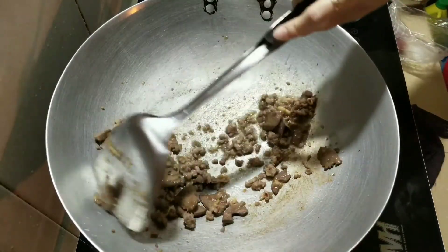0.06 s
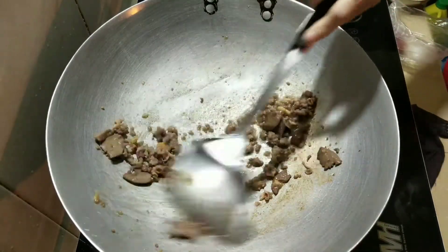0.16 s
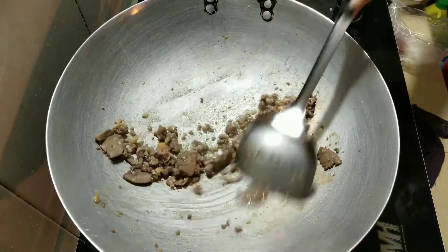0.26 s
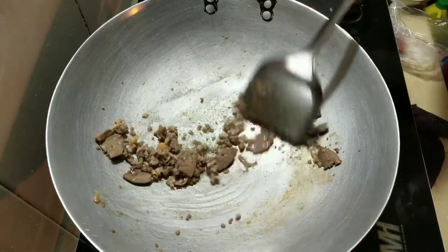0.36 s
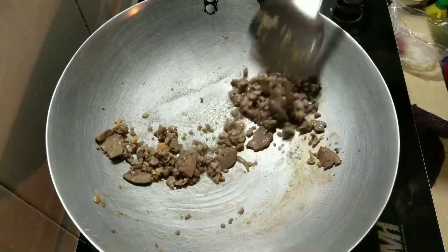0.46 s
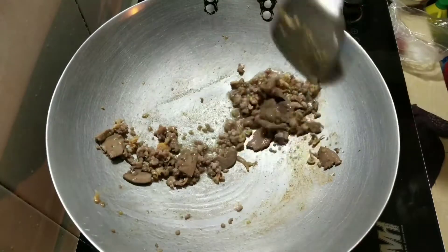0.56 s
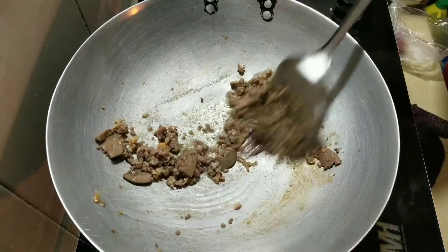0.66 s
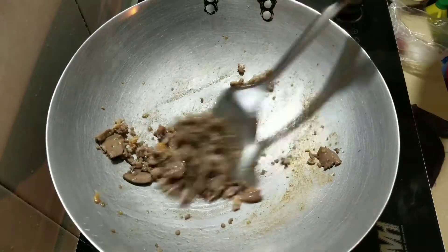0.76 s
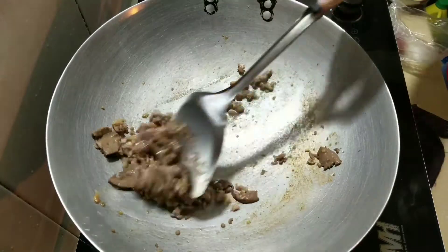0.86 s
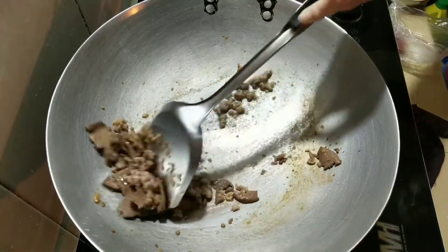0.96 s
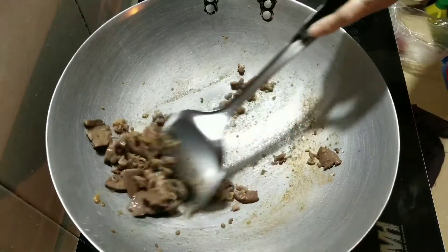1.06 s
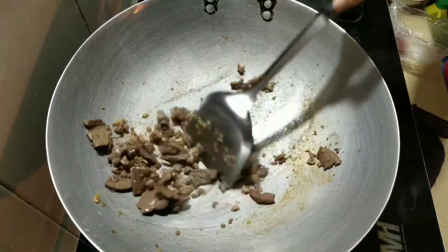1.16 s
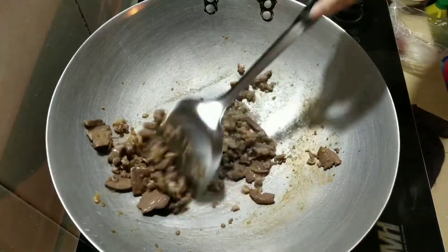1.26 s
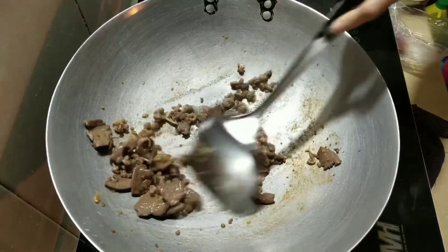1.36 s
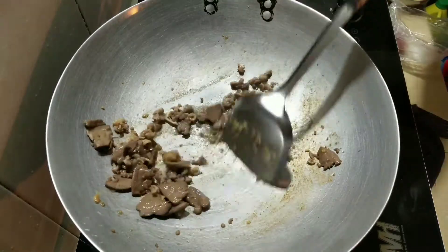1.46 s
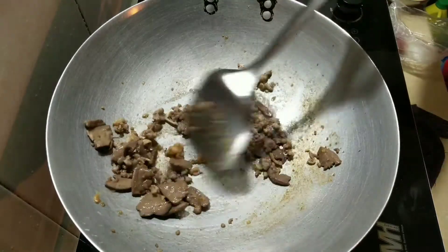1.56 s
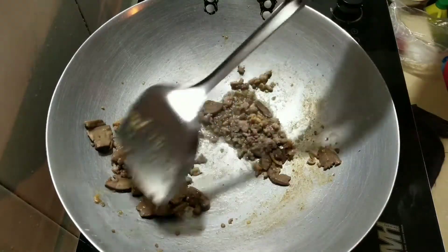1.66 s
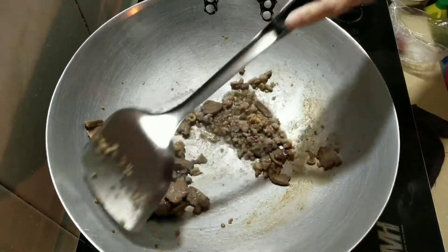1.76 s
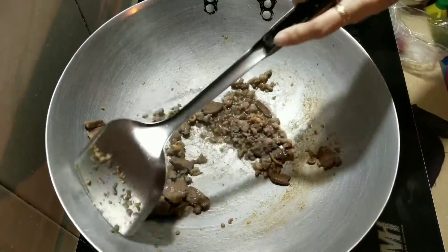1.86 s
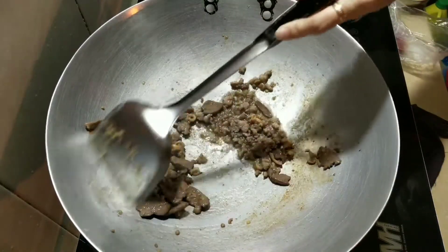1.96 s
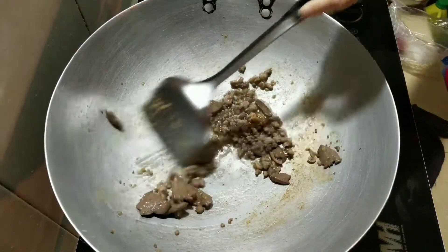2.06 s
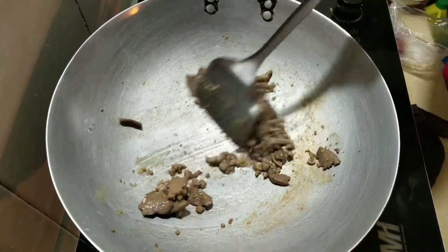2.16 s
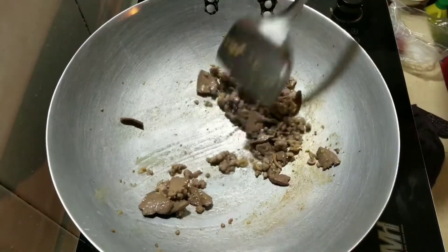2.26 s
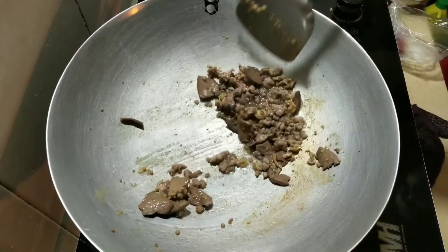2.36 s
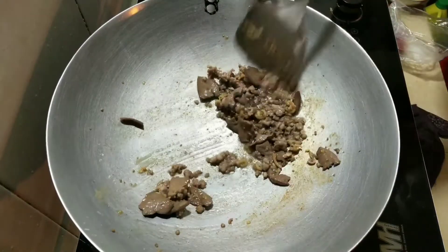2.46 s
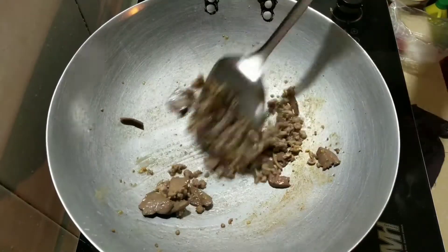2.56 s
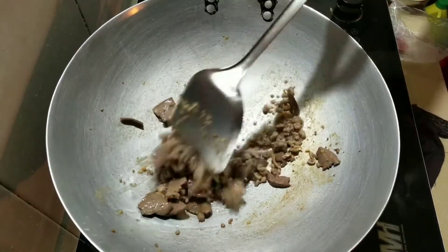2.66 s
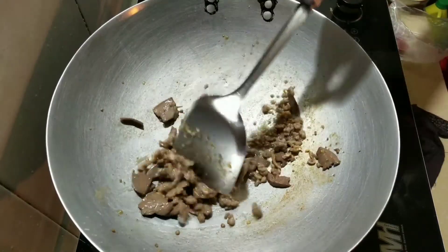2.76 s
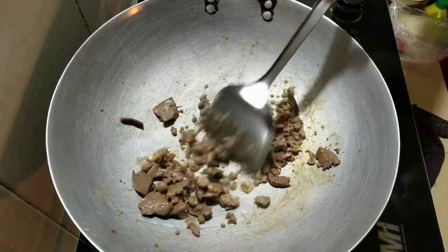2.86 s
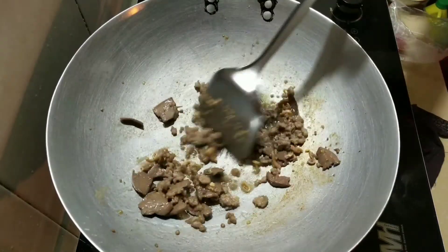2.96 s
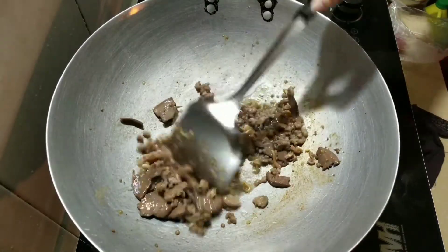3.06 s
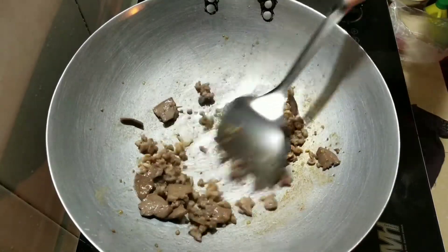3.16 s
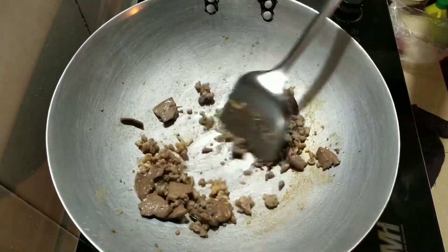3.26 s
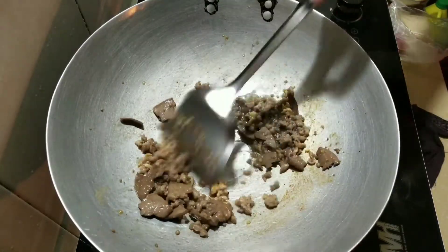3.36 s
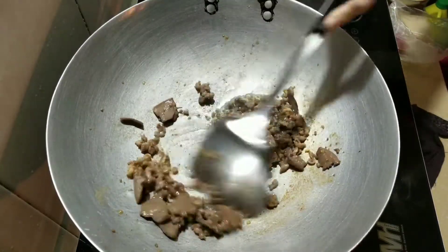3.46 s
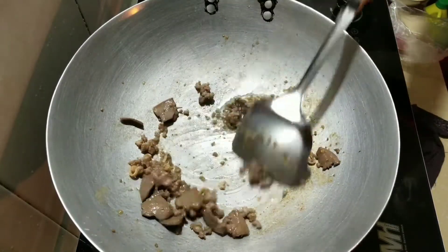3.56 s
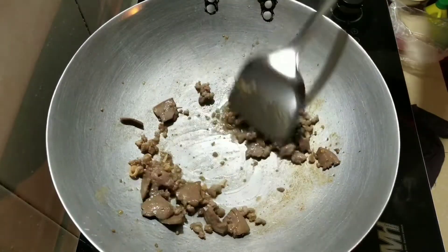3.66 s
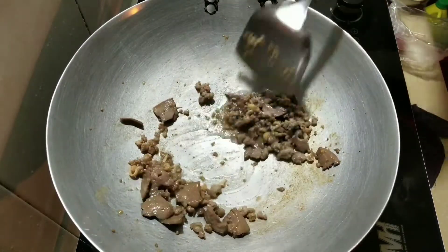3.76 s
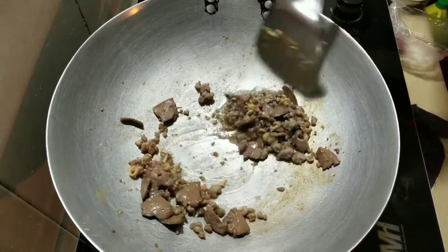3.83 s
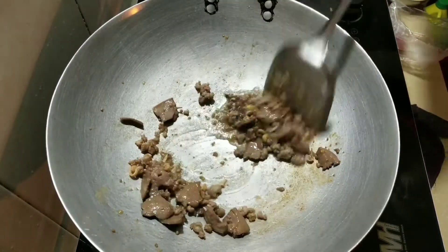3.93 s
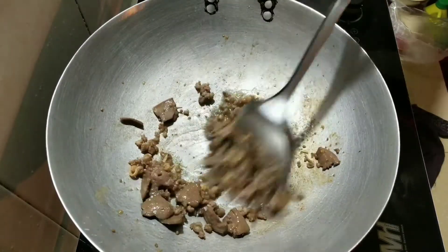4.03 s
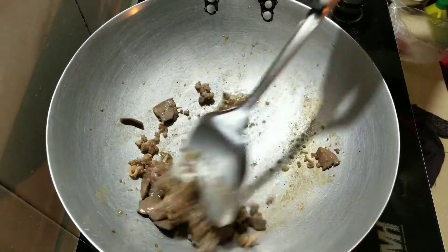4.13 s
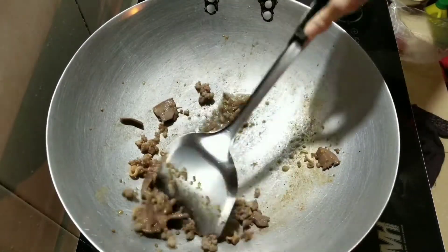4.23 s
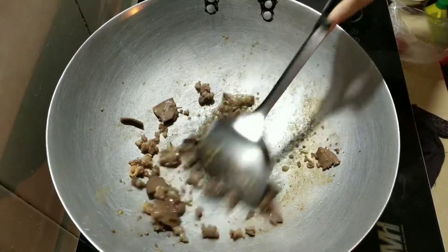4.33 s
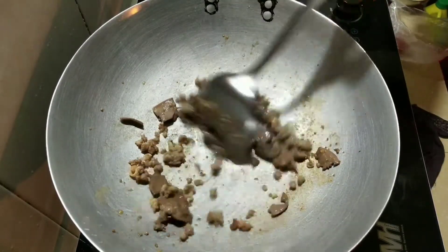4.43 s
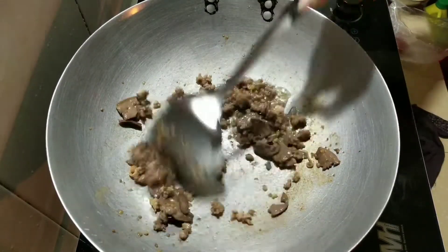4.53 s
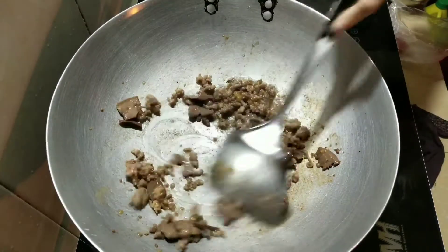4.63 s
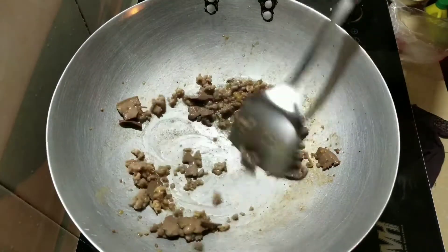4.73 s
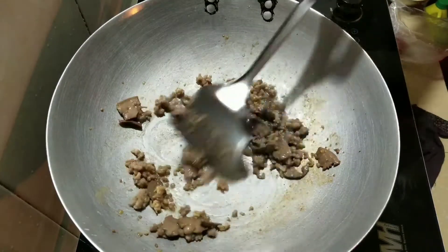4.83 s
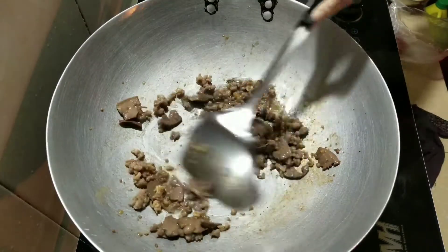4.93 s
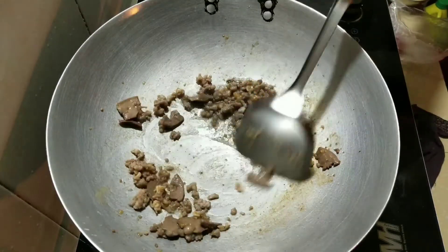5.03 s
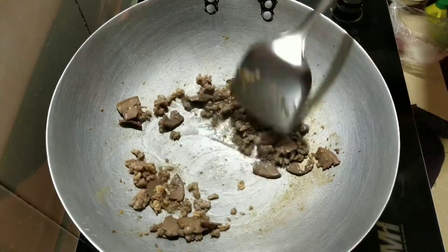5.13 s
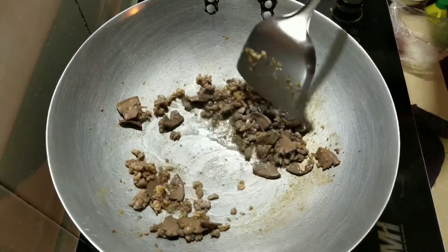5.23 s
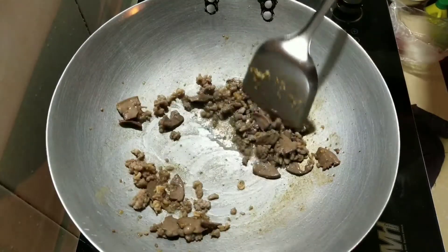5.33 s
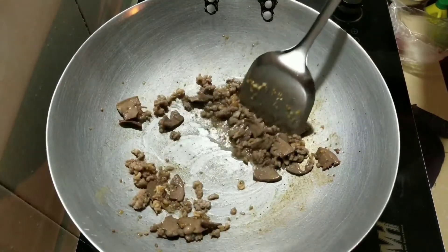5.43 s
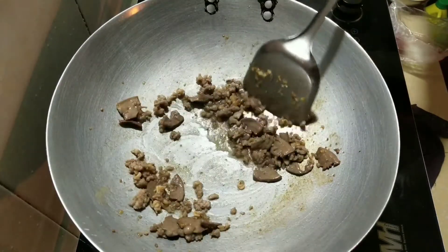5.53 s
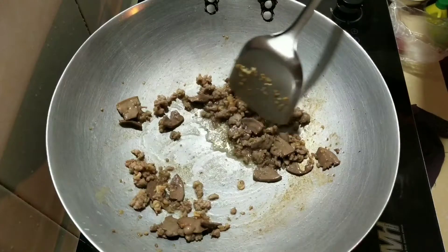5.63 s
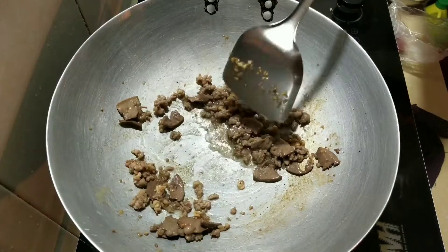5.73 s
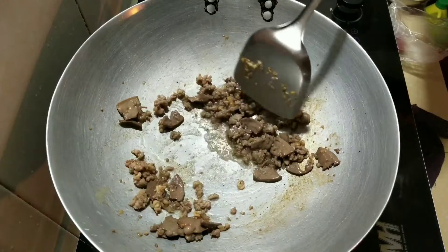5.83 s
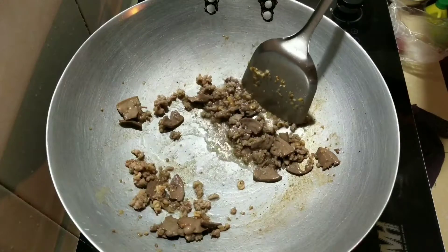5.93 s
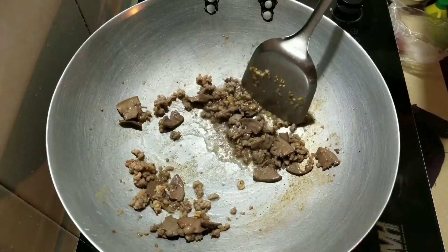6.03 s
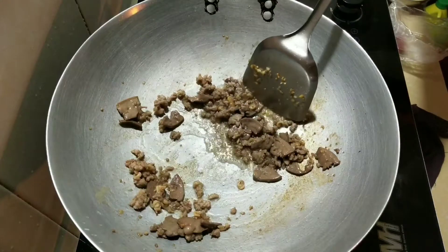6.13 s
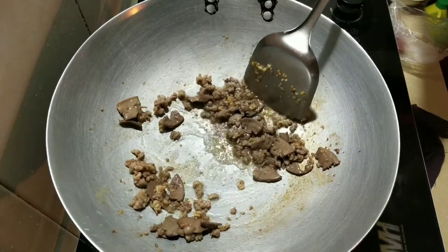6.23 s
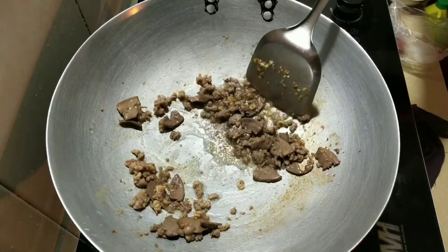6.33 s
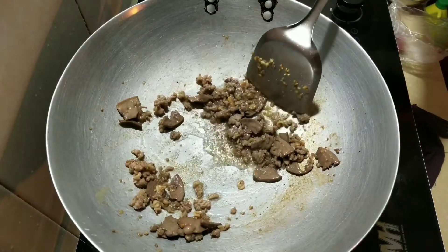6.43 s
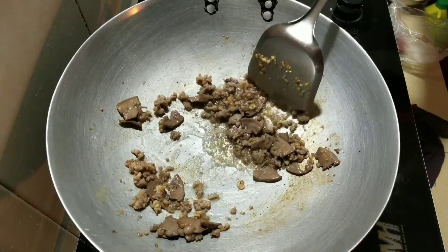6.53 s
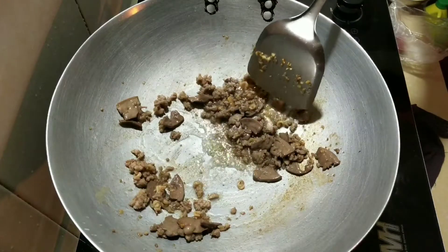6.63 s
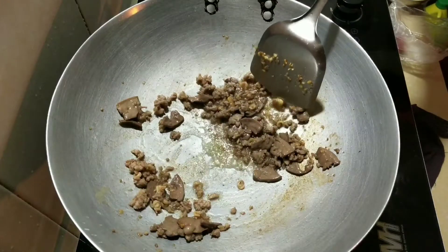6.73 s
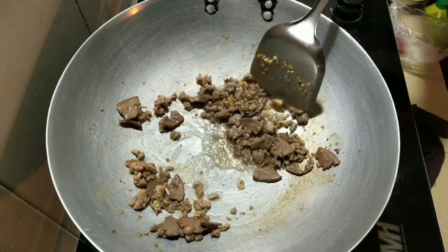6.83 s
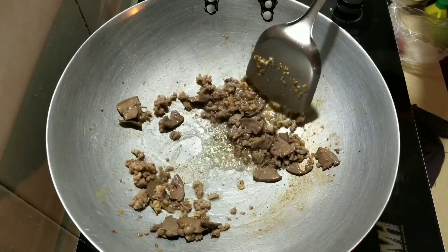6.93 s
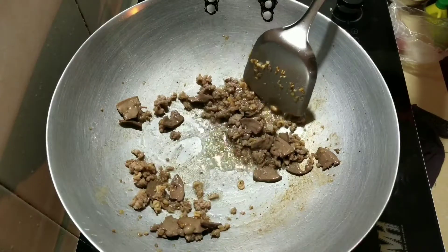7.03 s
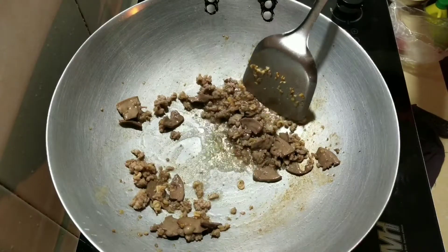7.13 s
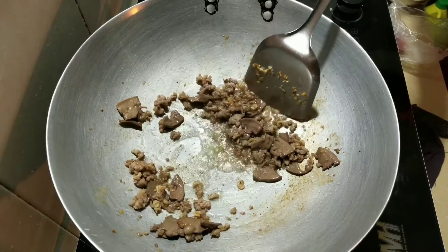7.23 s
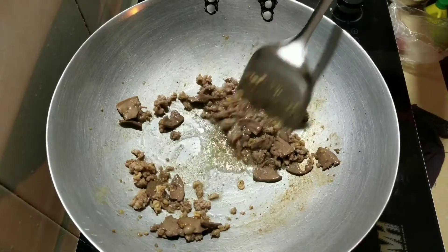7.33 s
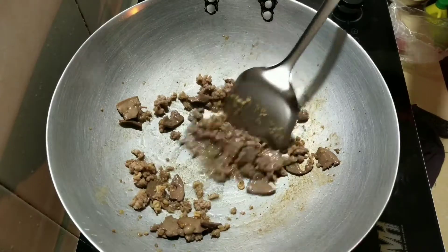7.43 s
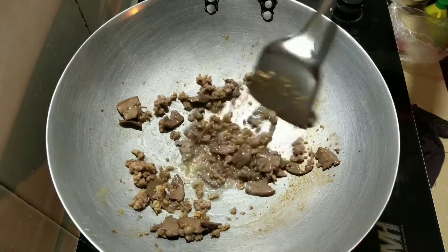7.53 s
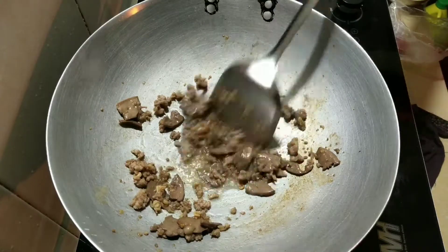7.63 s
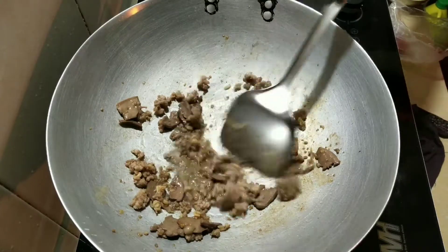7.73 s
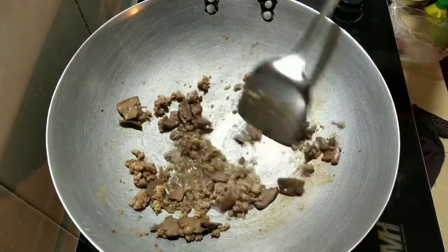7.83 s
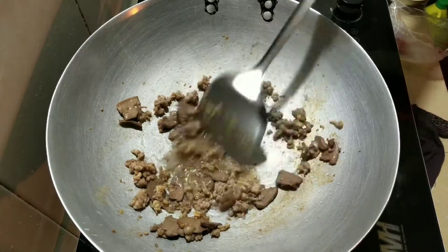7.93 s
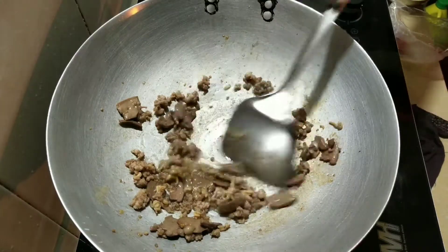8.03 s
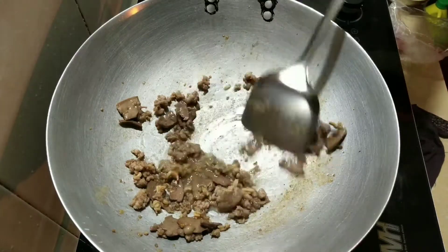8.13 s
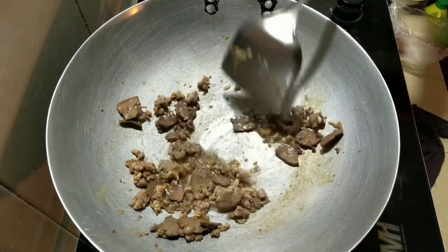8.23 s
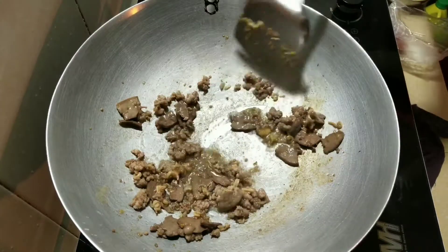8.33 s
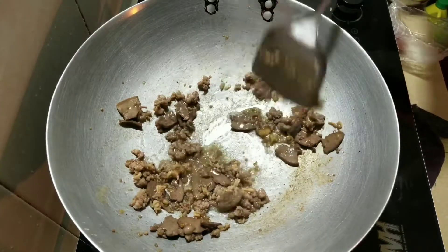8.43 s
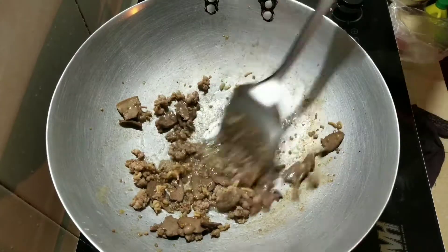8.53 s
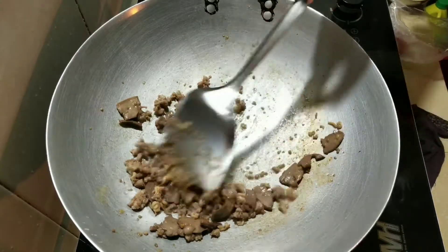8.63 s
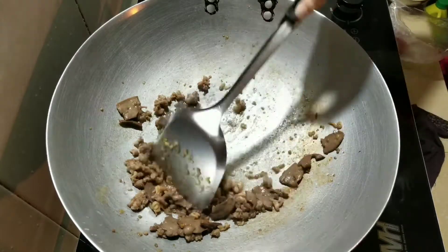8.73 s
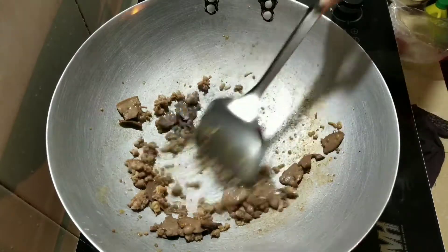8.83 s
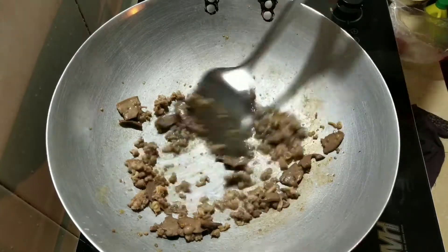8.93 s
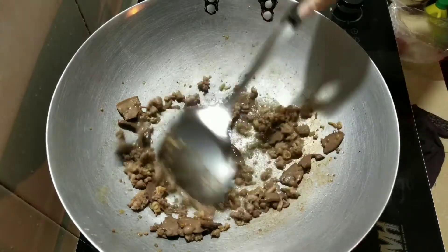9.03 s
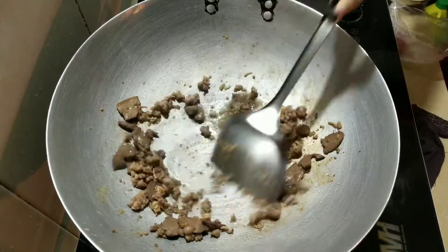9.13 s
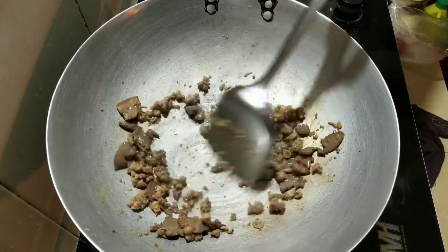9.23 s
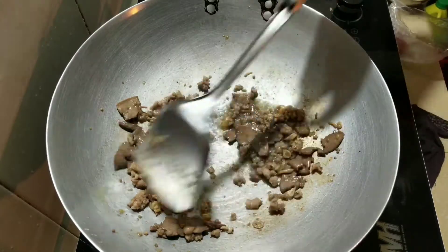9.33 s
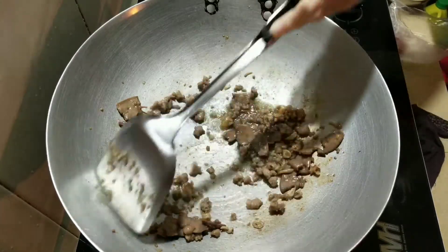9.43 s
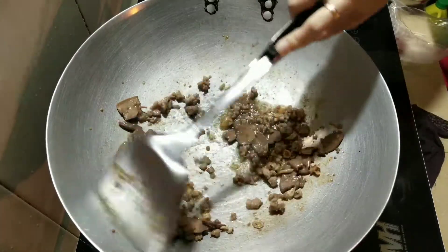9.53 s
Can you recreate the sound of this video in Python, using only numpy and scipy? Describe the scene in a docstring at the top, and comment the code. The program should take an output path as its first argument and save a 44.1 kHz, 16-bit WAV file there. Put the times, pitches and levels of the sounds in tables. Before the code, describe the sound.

A steel spatula clanks, rasps and groans against a thin wok over the continuous hiss of frying meat in a small kitchen.

```python
"""A kitchen stove, heard from just above a thin metal wok in which minced meat sizzles.
Bursting fat and ringing bubbles of juice make the hiss, which flares as the meat is turned onto hot metal.
A steel spatula strikes the wok and excites its modes, then is pushed across it: by stick-slip friction
the edge rasps and the blade judders and groans. Midway the spatula rests for two seconds while the frying
goes on. The stove rushes low underneath, and the small hard room reflects the knocks and groans."""
import sys
import numpy as np
from scipy import signal
from scipy.fft import rfft, irfft, next_fast_len
from scipy.io import wavfile
from scipy.ndimage import uniform_filter1d

SR = 44100
rng = np.random.default_rng(int(sys.argv[2]) if len(sys.argv) > 2 else 0)


def put_to_file(sound):
    """Save the sound as 16-bit audio at rate SR, in the file named by the first command-line argument."""
    columns = np.atleast_2d(sound).T  # one column per channel
    safe = np.clip(columns, -1, 1)
    whole_steps = np.round(safe * 32767)
    wavfile.write(sys.argv[1], SR, whole_steps.astype(np.int16))


N = 422919
TIME = np.arange(N) / SR

# Levels in all tables are relative: each source adds its own gain.
# The spatula turns the meat onto hot metal: peak_s, rise_s, fade_s, flare_db, rasp_db
TURNS = [ (0.35, 0.14, 0.15, 6.5, -38.5), (0.75, 0.27, 0.15, 9, -38), (1.21, 0.12, 0.18, 5.5, -37.5),
         (1.49, 0.12, 0.13, 5.5, -37), (2.06, 0.053, 0.13, 3, -23.5), (2.23, 0.12, 0.087, 3, -34),
         (2.58, 0.15, 0.15, 5, -38), (2.92, .07, .1, 4, -40), (3.05, .06, .07, 2.8, -44),
         (3.22, .08, .09, 4.8, -41), (3.35, .08, .1, 2, -44), (3.57, .08, 0.18, 3.5, -54),
         (4.06, 0.18, 0.11, 6, -53), (4.44, 0.1, 0.12, 7, -48), (4.74, 0.084, 0.16, 3.5, -36.5),
         (5.09, 0.12, 0.08, 2, -44), (7.45, .11, 0.15, 2.5, -35), (7.82, 0.22, 0.15, 3, -40),
         (8.14, 0.23, 0.19, 3, -44), (8.58, 0.13, 0.11, 4.5, -36), (8.95, 0.094, 0.21, 5, -38),
         (9.22, 0.082, 0.12, 4, -44)]
# Likeness of the sound at the two microphones: frequency_hz, coherence
COHERENCE = [(60, 0.98), (300, 1), (640, 0.76), (1400, 0.47), (3000, 0.26), (6000, 0), (15000, 0.013)]


def sizzle(fat_db, bursts_per_s=9000, flutter_db=0.5):
    """Shot noise: thousands of tiny bursts of fat merge over an equally strong hiss of steam."""
    # Spectrum of spitting fat: frequency_hz, level_db
    fat_spectrum = [(60, -62), (600, -12.5), (1200, -10), (2500, -12), (3700, -8), (4700, -6), (5800, -4.5),
                    (6800, -1), (7700, -4), (9200, -9.5), (11000, -12), (13500, -13.5), (15500, -10.5)]
    hiss = grains(bursts_per_s, spread_db=0) + rng.standard_normal((2, N))
    level_db = fat_db - 0.19 + flutter_db * wander(70, N)
    return shaped_pair(hiss, fat_spectrum) * gain_of(level_db)


def juice(juice_db, pops_per_pitch_per_s=130, decay_cycles=5, froth_gain=3.5, spurt_db=0.8):
    """Bubble resonance: juice boils in spurts, each bubble ringing briefly over a froth of finer ones."""
    # Spectrum of boiling juice: frequency_hz, level_db
    juice_spectrum = [(60, -48), (600, -22), (1200, -13), (1900, -4), (2450, 0), (3100, -1.5), (4000, -6.5),
                      (5500, -26), (9000, -19.5)]
    pops, t = np.zeros((2, N)), np.arange(SR // 50) / SR
    count = int(pops_per_pitch_per_s * N / SR)
    for hz in np.geomspace(1400, 4500, num=14):
        when, ear, rarity = rng.random((4000, 3))[:count].T
        clicks = np.zeros((2, N))
        clicks[(2 * ear).astype(int), (N * when).astype(int)] = gain_of(-0.87 * np.log(rarity + 0.00064))
        bubble = np.sin(2 * np.pi * hz * t) * np.exp(-t * hz / decay_cycles)
        pops += signal.oaconvolve(clicks, bubble[None], axes=1)[:, :N]
    boil = unit_rms(band(pops, 510, 11000)) + froth_gain * rng.standard_normal((2, N))
    return shaped_pair(boil, juice_spectrum) * gain_of(juice_db - 0.94 + spurt_db * wander(16, N))


def spits(decay_s=0.003):
    """Impulsive sources: single larger drops of fat burst above the hiss."""
    # Bursting drops: start_s, level_db
    drops = [(5.7486, -31), (6.3582, -25), (6.877, -24), (7.228, -26), (7.3295, -24)]
    out, t = np.zeros((2, N)), np.arange(SR // 40) / SR
    for start_s, db in drops:
        pop = band(rng.standard_normal((2, len(t))) * np.exp(-t / decay_s), 1200, 5500)
        add(out, start_s, gain_of(db + 5) * pop / abs(pop).max())
    return out


def frying_levels(juice_db_per_flare_db=1.1):
    """Heat transfer: fat and juice follow the pan's slow heat and flare when meat meets hot metal."""
    # Frying between turns: time_s, fat_db, juice_db
    heat = [(0, -30.5, -36), (1.0, -35, -41), (1.8, -33.5, -38.5), (2.8, -32, -35), (4.251, -32.5, -40.5),
            (5.35, -32.5, -36.5), (7.2, -32, -36.5), (8.8, -32, -38), (9.59, -32.5, -37.5)]
    time_s, fat_db, juice_db = np.transpose(heat)
    flare_db = sum(db * np.sin(np.pi / 2 * swell(peak, rise, fade)) for peak, rise, fade, db, _ in TURNS)
    return (np.interp(TIME, time_s, fat_db) + flare_db,
            np.interp(TIME, time_s, juice_db) + juice_db_per_flare_db * flare_db)


def knocks(contact_s=0.0012, bare_clash_db=-20, bump_t60_s=0.13):
    """Impact and rebound: the spatula bounces on bare metal; some blows bump the wok on its stand."""
    # Blows of the spatula: start_s, thud_db, thud_hz, ring_db, clash_db
    blows = [ (0.135, -10, 331, -69, -33), (0.226, -25, 355, -53, -45), (0.571, -23, 338, -19.5, -18.5),
             (0.644, -13.5, 407, -29.5, -19.5), (1.096, -5, 520, -29.5, -24.5), (1.138, -23, 410, -48, -39),
             (1.167, -25.5, 380, -51, -40), (1.905, -11, 530, -20.5, -31), (1.974, -10.5, 285, -44, -34.5),
             (2.009, -7.5, 547, -23.5, -26.5), (2.186, -3.5, 367, -33, -24.5),
             (2.462, -14.5, 430, -18, -14), (3.193, -34.5, 363, -55, -40), (3.524, -30, 370, -59, -41),
             (3.704, -33.5, 345, -59, -46), (3.911, -11, 500, -24, -13.5), (3.956, -10.5, 356, -38, -43),
             (4.368, -34, 377, -59, -44), (4.664, -25.5, 430, -55, -50), (4.792, -22.5, 414, -52, -46),
             (5.045, -25, 372, -54, -42), (5.485, -38, 357, -46, -48), (7.371, -24.5, 390, -53, -44),
             (7.844, -25.5, 334, -55, -36), (8.063, -30, 357, -59, -44), (8.465, -10.5, 447, -26.5, -18.5),
             (8.997, -8, 490, -50, -29), (9.536, -7, 590, -19, -21.5)]
    # Rebounds: delay_s, thud_change_db, thud_frequency_ratio, ring_and_clash_change_db
    rebounds = [(0.009, -1, 0.64, -5), (0.03, -3.5, 0.75, -10.5)]
    # Harder blows thud over a wider band: thud_db, band_edge_ratio
    thud_widths = [(-26, 1.25), (-11.5, 1.636)]
    # The wok against its stand: start_s, level_db
    bumps = [(0.645, -42), (2.189, -34.5), (2.462, -29.5), (3.914, -44), (8.466, -45)]
    out, t = np.zeros((2, N)), np.arange(SR // 4) / SR
    first_contact = [(0.00037, 0, 1, 0)]  # columns as in rebounds
    for start_s, thud_db, thud_hz, ring_db, clash_db in blows:
        contacts = first_contact + (rebounds if clash_db > bare_clash_db else [])
        for delay_s, softer_db, ratio, duller_db in contacts:
            width = np.interp(thud_db + softer_db, *np.transpose(thud_widths))
            hit = knock(thud_db + softer_db, thud_hz * ratio, width,
                        ring_db + duller_db, clash_db + duller_db)
            add(out, start_s + contact_s + delay_s, hit)
    for start_s, db in bumps:
        bump = band(rng.standard_normal(len(t)) * gain_of(-60 * t / bump_t60_s), 59, 185)
        add(out, start_s, gain_of(db) * unit_onset(bump))
    return out


def knock(thud_db, thud_hz, width, ring_db, clash_db, crack_t60_s=0.087, choke_s=0.011):
    """Impulse response: a blow excites a thud, a dense crack and wok modes damped by meat and blade."""
    # Short-lived dense vibration of a blow: frequency_hz, level_db
    crack_spectrum = [(30, -25), (100, 14), (220, 13.5), (550, 4.5), (750, -7), (1200, -7.5), (2200, -1.5),
                      (3000, -2.5), (3850, -6.5), (5000, 1), (6800, -1.5), (8500, -5.5), (11000, -12),
                      (15500, -12.5)]
    t = np.arange(SR * 2 // 5) / SR
    crack = shaped_pair(rng.standard_normal((2, len(t))), crack_spectrum)
    crack *= gain_of(9 - 60 * t / crack_t60_s)
    bareness = np.clip(gain_of(ring_db - thud_db), 0, 1)  # clear of the meat, the pan rings on
    free_share = 0.14 + 0.86 * bareness
    damping = free_share + (1 - free_share) * np.exp(-t / choke_s)
    blow = crack * gain_of(-6 * bareness) + wok_ring(t) * damping
    blade = np.sin(2 * np.pi * thud_hz * t) * np.exp(-t * thud_hz / 2)  # dies within a few cycles
    # A blow cushioned by meat mostly thuds; bare steel also wakes the high modes.
    edges_hz = thud_hz / width, thud_hz * width
    thud = unit_onset(unit_onset(band(blow, *edges_hz)) + 0.78 * unit_onset(band(blade, *edges_hz)))
    ring = unit_onset(band(blow, 927, 1640, order=4))
    bite = (1 + np.exp(-t / 0.01)) * (1 - np.exp(-t / 0.00041))
    clash = unit_onset(band(blow, 1880, 18000) * bite)
    return gain_of(thud_db - 7) * thud + gain_of(ring_db) * ring + gain_of(clash_db + 1) * clash


def wok_ring(t, detune=0.0011):
    """Modal superposition: damped sines in random phase, the high ones out of step at the microphones."""
    # Modes of wok and blade: frequency_hz, level_db, t60_s
    modes = [(128, 0, 0.3), (176, -5, 0.29), (228, 1, 0.31), (252.9, 3.5, 0.47), (276, -4, 0.14),
             (348, 2, 0.8), (366, -8.5, 0.3), (402, 2.5, 0.32), (433, 0, 0.35), (481, 4.5, 0.045),
             (562, 2, 0.36), (586, -4.5, 0.27), (655.5, -2.5, 0.22), (789, -4, 0.41), (970, -6.5, 0.3),
             (1077, -6.5, 0.27), (1223, -6, 0.16), (1295, -2.5, 0.082), (1455, -14, 0.16),
             (1838, -11.5, 0.23), (2220, -8, 0.31), (2690, -28, 0.16), (3410, -7.5, 0.12), (3770, -3, 0.11),
             (3994, 0.5, 0.048), (4400, -6.5, 0.14), (5270, -13, 0.15), (5960, 3, 0.06), (6660, 3.5, 0.074),
             (6900, -8, 0.065), (7130, 3.5, 0.056), (7530, -7, .15), (8400, -10, 0.14)]
    hz, db, t60_s = np.transpose(modes)[:, :, None]
    hz = hz * (1 + detune * rng.standard_normal(hz.shape))  # the meat loads the metal anew each time
    phase = 2 * np.pi * hz * t + rng.uniform(0, 2 * np.pi, hz.shape)
    offset = np.arccos(value_at(COHERENCE, hz)) * rng.choice([-0.5, 0.5], hz.shape)
    decay = gain_of(db - 60 * t / t60_s)
    return np.array([(decay * np.sin(phase + side * offset)).sum(0) for side in (-1, 1)])


def groan(slips_per_s=260, start_pitch_ratio=0.82, pitch_jitter=0.046, shudder_db=4.0):
    """Stick-slip oscillation: the blade sings higher and brighter as it is pressed, and the wok rings."""
    # Pushes of the blade: peak_s, rise_s, fade_s, level_db, peak_pitch_hz, end_pitch_hz
    strokes = [ (0.78, 0.098, 0.091, -25, 465, 410), (1.315, 0.065, 0.078, -21, 496, 568),
               (1.469, 0.087, 0.094, -27, 402, 371), (2.05, 0.053, 0.089, -16.5, 564, 450),
               (2.145, .045, .04, -20.5, 469, 420), (2.235, 0.034, 0.103, -21, 320, 181),
               (2.591, 0.071, 0.039, -19, 410.6, 393), (4.059, 0.092, 0.15, -36, 367, 360),
               (4.709, 0.072, 0.059, -31.5, 407, 420), (4.9, 0.12, 0.124, -21, 449.7, 366),
               (7.419, 0.054, 0.135, -29, 444.5, 405), (7.852, 0.14, 0.044, -34.5, 399, 353),
               (8.131, 0.065, 0.049, -33, 416.5, 390), (8.6, .08, 0.15, -27.5, 411.7, 338),
               (9.111, 0.087, 0.085, -29, 489, 412), (9.211, 0.066, 0.17, -27.5, 410, 384)]
    # Modes of the singing blade: frequency_ratio, level_db
    blade_modes = [(1.001, 4), (1.571, -16.5), (2.478, -18)]
    out = np.zeros(N)
    slips = grains(slips_per_s, spread_db=1)[0] + 0.9 * rng.standard_normal(N)
    wok_response = wok_ring(np.arange(SR // 3) / SR)[0]
    wok = band(signal.oaconvolve(slips, wok_response)[:N], 277, 820)
    for peak, rise, fade, db, peak_hz, end_hz in strokes:
        push = swell(peak, rise, fade)
        moving = push > 0
        t, blade = TIME[moving], 0
        hz = np.interp(t, [peak - rise, peak, peak + fade], [start_pitch_ratio * peak_hz, peak_hz, end_hz])
        for ratio, mode_db in blade_modes:
            cycles = np.cumsum(ratio * hz * (1 + pitch_jitter * wander(215, len(t)))) / SR
            brightness = (hz / 520) ** (3 * (ratio - 1))
            amplitude = brightness * gain_of(mode_db + shudder_db * wander(133.2, len(t)))
            blade += amplitude * np.sin(2 * np.pi * cycles)
        sound = unit_rms(blade) + 0.39 * unit_rms(wok[moving])
        add(out, t[0], sound * gain_of(db - 4) * push[moving] ** 1.25)
    return out


def rasp(catches_per_s=6000, chatter_db=1.5):
    """Friction noise: the edge catches on the rough metal in a fast, uneven chatter."""
    # Spectrum of the scraping edge: frequency_hz, level_db
    rasp_spectrum = [(30, -37), (200, -3), (500, 3.5), (800, -7.5), (1100, 2), (1600, -6), (2400, -16),
                     (4200, -8.5), (7500, -4.5), (10000, -18), (15500, -15)]
    push = sum(gain_of(db) * swell(peak, rise, fade) ** 0.61 for peak, rise, fade, _, db in TURNS)
    scrape = shaped_pair(grains(catches_per_s, spread_db=2.9), rasp_spectrum)
    return scrape * push * gain_of(-2 + chatter_db * wander(130, N))


def stove(level_db=-46, waver_db=0.57):
    """Broadband noise: the stove's low, nearly steady rush under the pan."""
    # Spectrum of the rush: frequency_hz, level_db
    rush_spectrum = [(20, -21), (45, -21), (65, -12.5), (85, -3.5), (130, 2), (175, -3), (240, -11.5),
                     (380, -9), (550, -18.5), (900, -26), (2000, -26)]
    rush = shaped_pair(rng.standard_normal((2, N)), rush_spectrum)
    return rush * gain_of(level_db + waver_db * wander(6, N))


def kitchen(x, gap_s=0.006):
    """Reverberation: the small hard room's dense reflections, each band decaying at its own rate."""
    # Reverberation times: frequency_hz, t60_s
    decay_times = [(150, 0.74), (500, 0.4), (2000, 0.51), (7000, 0.23), (15000, 0.29)]
    hz, t, noise = signal.stft(paired(rng.standard_normal((2, SR // 2))), SR, nperseg=256)
    decay = gain_of(-60 * t / value_at(decay_times, hz)[:, None]) * (t > gap_s)
    tail = signal.istft(noise * decay, SR, nperseg=256)[1]
    return signal.fftconvolve(x, tail / np.linalg.norm(tail[0]), axes=1)[:, :N]


def patchy(x, depth_db):
    """Random modulation: patches of the spectrum, some hundred Hz wide and a moment long, swell and fade."""
    spectrogram = signal.stft(x, nperseg=512)[2]
    field = rng.standard_normal(spectrogram.shape[1:])
    for _ in range(2):
        field = uniform_filter1d(field, size=4, axis=0)  # across frequency
        field = uniform_filter1d(field, size=7, axis=1)  # across time
    return signal.istft(spectrogram * gain_of(depth_db * unit_rms(field)), nperseg=512)[1][:, :x.shape[-1]]


def paired(x):
    """Partial coherence: two unrelated signals become alike in the bass and stay apart in the treble."""
    size = next_fast_len(x.shape[-1])
    a, b = rfft(x, size)
    coherence = value_at(COHERENCE, np.fft.rfftfreq(size, 1 / SR))
    mid, side = a * np.sqrt((1 + coherence) / 2), b * np.sqrt((1 - coherence) / 2)
    return irfft(np.array([mid + side, mid - side]), size)[..., :x.shape[-1]]


def coloured(x, spectrum):
    """Linear filtering by a curve of (frequency_hz, gain_db) points."""
    size = next_fast_len(x.shape[-1])
    gain = gain_of(value_at(spectrum, np.fft.rfftfreq(size, 1 / SR)))
    return irfft(rfft(x, size) * gain, size)[..., :x.shape[-1]]


def shaped_pair(x, spectrum):
    """Spectral shaping of two noises into a partly coherent pair of unit power."""
    return unit_rms(paired(coloured(x, spectrum)))


def grains(per_s, spread_db):
    """A Poisson process in each channel: random clicks, most small and a few large."""
    sizes = gain_of(spread_db * np.minimum(rng.exponential(1, N), 6))
    return unit_rms(sizes * (rng.random(N) < per_s / SR) * rng.standard_normal((2, N)))


def swell(peak_s, rise_s, fade_s):
    """Triangular envelope of one arm movement: from 0 up to 1 and back."""
    return np.interp(TIME, [peak_s - rise_s, peak_s, peak_s + fade_s], [0, 1, 0])


def wander(per_s, length):
    """Random fluctuation of about unit size."""
    knots = rng.standard_normal(8000)
    return np.interp(np.arange(length) / SR * per_s, np.arange(len(knots)), knots)


def value_at(points, hz):
    """Linear interpolation of a table on a logarithmic frequency axis."""
    table_hz, values = np.transpose(points)
    return np.interp(np.log(hz + 1), np.log(table_hz + 1), values)


def band(x, low_hz, high_hz, order=2):
    return signal.sosfilt(signal.butter(order, [low_hz, high_hz], "band", fs=SR, output="sos"), x)


def gain_of(db):
    return 10 ** (np.asarray(db) / 20)


def unit_rms(x):
    return x / np.sqrt(np.mean(x ** 2) + 1e-20)


def unit_onset(x):
    """Normalisation of a hit to unit strength over its first 20 ms."""
    return x / x[..., :SR // 50].std()


def add(mix, start_s, sound):
    part = mix[..., max(round(start_s * SR), 0):][..., :sound.shape[-1]]
    part += sound[..., :part.shape[-1]]


def scene():
    """Superposition of the frying, the spatula with its reflections, and the stove."""
    spatula = knocks() + groan()
    fat_db, juice_db = frying_levels()
    frying = patchy(sizzle(fat_db), depth_db=1.08) + patchy(juice(juice_db), depth_db=1.82) + spits()
    return frying + spatula + gain_of(-8) * kitchen(spatula) + patchy(rasp(), depth_db=4.0) + stove()


def record(dry, cutoff_hz=15900):
    """Transduction: two microphones differ in colour, saturate softly on hard blows and limit the band."""
    # Excess of the right microphone over the left: frequency_hz, level_db
    imbalance = [(60, -1), (130, 1), (280, 3), (1000, 0.7), (2500, 1.5), (5000, -0.4), (9000, 0.8),
                 (14000, -0.8)]
    left = coloured(dry[0], [(hz, -db / 2) for hz, db in imbalance])
    right = coloured(dry[1], [(hz, db / 2) for hz, db in imbalance])
    rounded = np.tanh(np.array([left, right]))
    low_pass = signal.firwin(511, cutoff_hz, window=("kaiser", 9), fs=SR)
    return signal.oaconvolve(rounded, low_pass[None], "same")


dry = scene()
out = record(dry)
put_to_file(out)
```